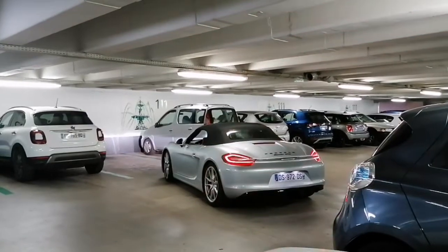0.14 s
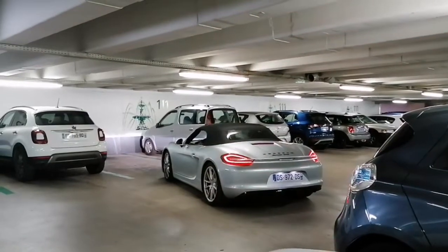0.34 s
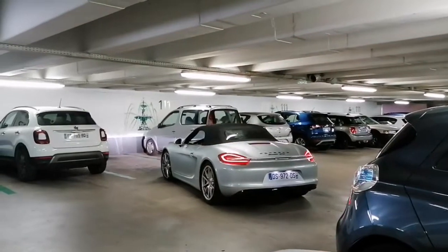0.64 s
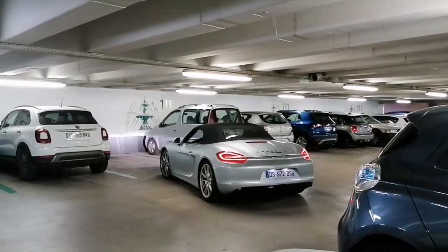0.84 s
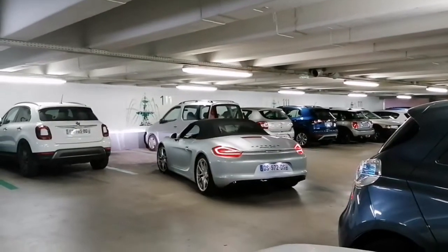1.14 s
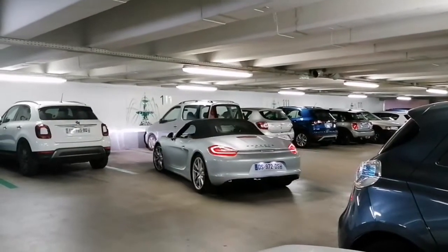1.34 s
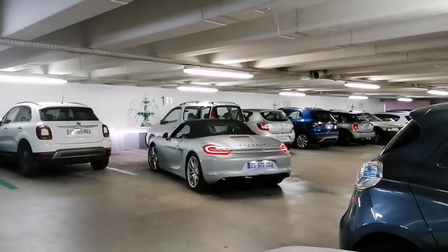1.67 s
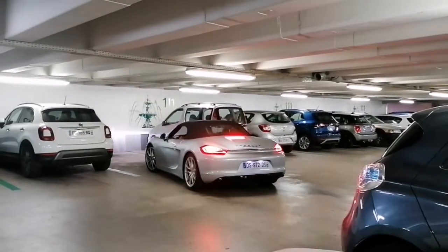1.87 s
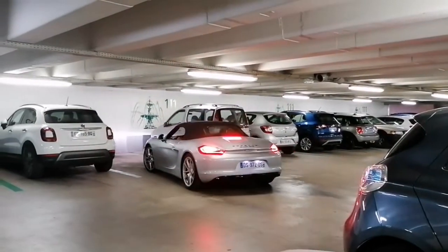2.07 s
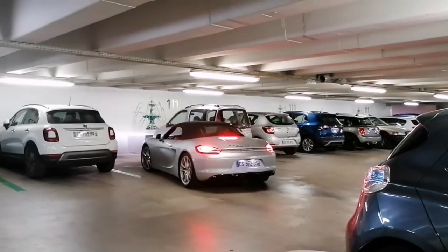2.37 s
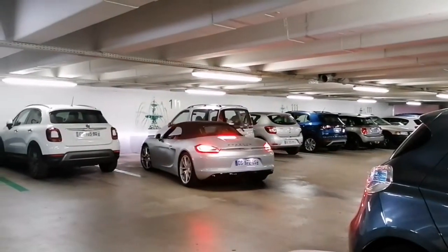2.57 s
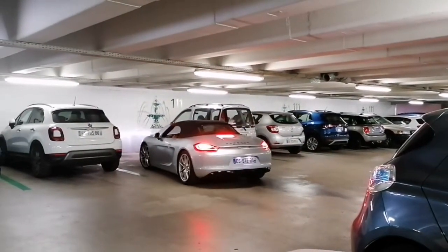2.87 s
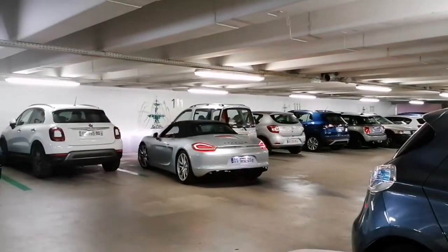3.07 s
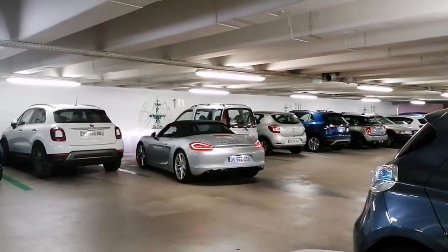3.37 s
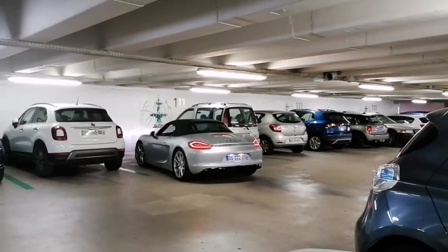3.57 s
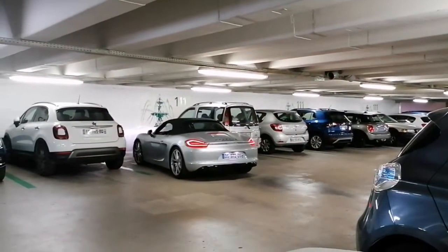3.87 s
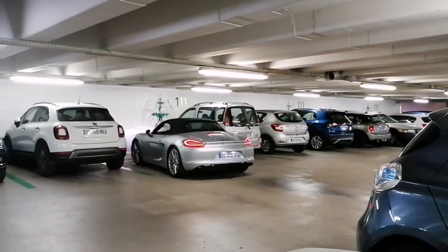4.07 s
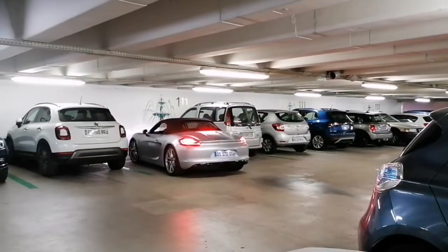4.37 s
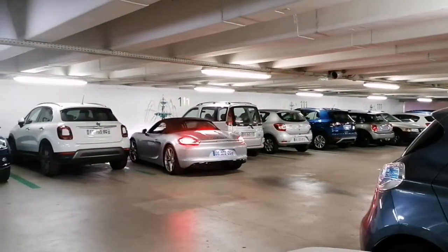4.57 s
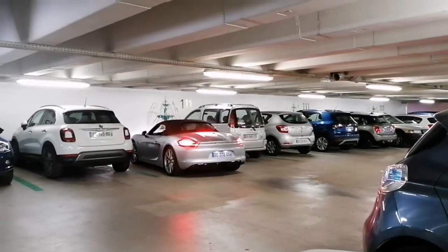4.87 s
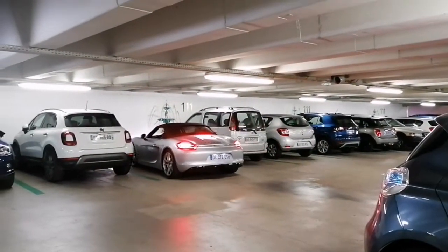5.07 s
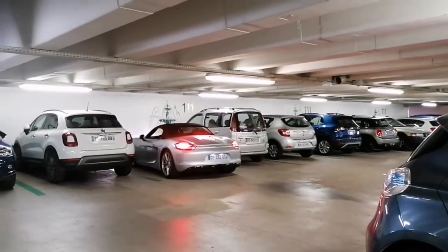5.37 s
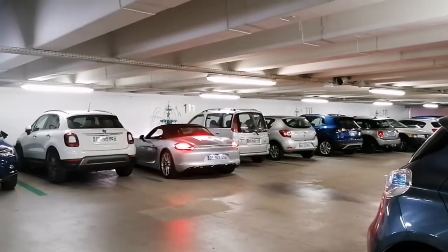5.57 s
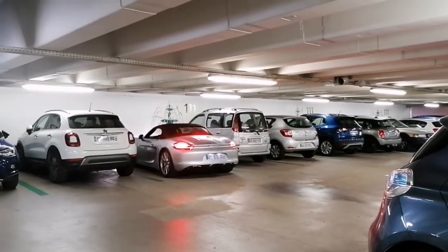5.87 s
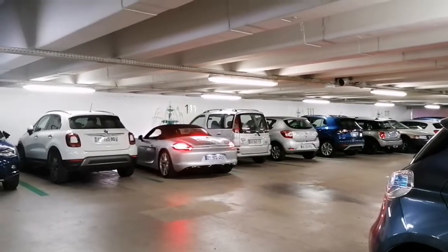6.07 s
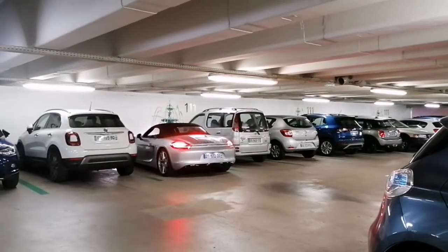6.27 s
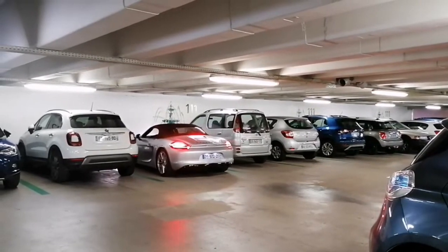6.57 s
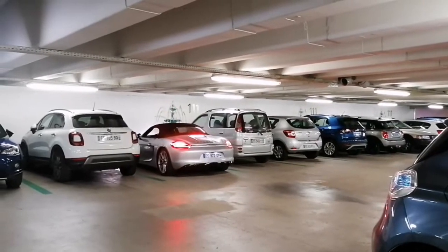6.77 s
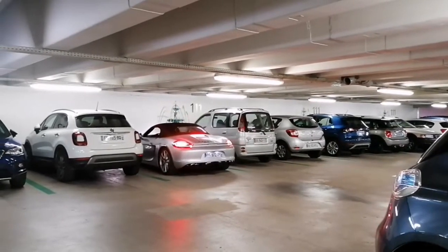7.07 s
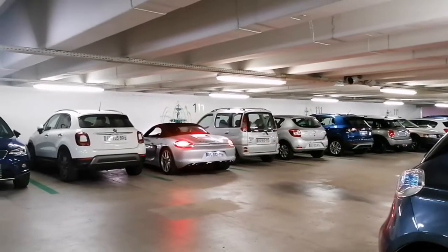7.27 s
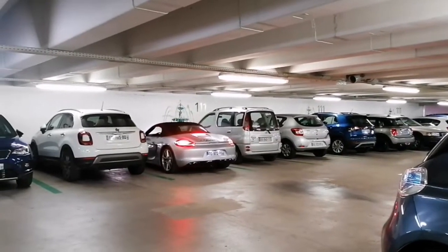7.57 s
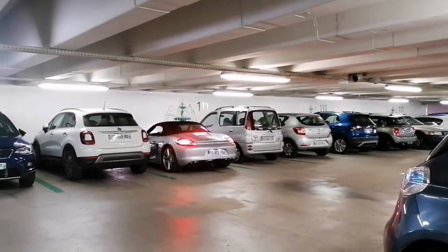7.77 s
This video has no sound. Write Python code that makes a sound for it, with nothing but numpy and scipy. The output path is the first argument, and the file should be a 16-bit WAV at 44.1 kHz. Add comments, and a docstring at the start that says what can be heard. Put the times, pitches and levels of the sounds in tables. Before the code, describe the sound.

A sports car gives a light rev, drops to a deep burbling idle and creeps into a space in an echoing underground car park.

```python
"""A flat-six sports car creeps into a space in a concrete underground car park, heard from across the aisle.
A light rev drops to idle: firing harmonics boom and fade as the car rolls through standing waves, pulses filtered
by silencers and tailpipes burble and puff, and filtered noise makes the engine bay's rush and the ventilation's hiss.
Narrow wandering tones sing from the rev onwards; then brake pads brush as swells of coloured noise, a tyre chirps
as one very short tone, and a wavering whine joins the last creep."""
import sys
import numpy as np
from scipy import signal
from scipy.fft import rfft, irfft
from scipy.io import wavfile
from scipy.ndimage import uniform_filter1d

SR = 44100
rng = np.random.default_rng(int(sys.argv[2]) if len(sys.argv) > 2 else 0)


def wav_record(signal):
    """Record a signal, one row per channel, as 16-bit PCM in the file named by sys.argv[1]."""
    frames = np.transpose(np.atleast_2d(signal))
    bounded = np.clip(frames, -1, 1)
    # unit amplitude maps onto the largest positive 16-bit level
    quanta = np.round(bounded * 32767).astype(np.int16)
    wavfile.write(sys.argv[1], SR, quanta)


N = 348831

RING_RISE_S, RING_FALL_S = 0.06, 0.2   # edges of the narrow tones and the whine


def from_db(db):
    """Decibels to gain."""
    return 10 ** (np.asarray(db) / 20)


def rms_one(x):
    """Scale to unit power."""
    return x / np.sqrt(np.mean(x ** 2) + 1e-20)


def in_time(rows):
    """Each column of a curve table, interpolated sample by sample."""
    s, *columns = np.transpose(rows)
    return [np.interp(np.arange(N) / SR, s, column) for column in columns]


def drift(rate_hz):
    """Slow random wander of spread 1: noise through two equal poles, run at a fortieth of the sample rate."""
    step = 40
    warm_up = 2000
    pole = np.exp(-2 * np.pi * rate_hz * step / SR)
    white = rng.standard_normal(N // step + warm_up + 2)
    slow = signal.lfilter([1], [1, -2 * pole, pole * pole], white)[warm_up:]
    return np.interp(np.arange(N) / step, np.arange(len(slow)), rms_one(slow))


def colour(x, points):
    """Causal (minimum-phase) filter through the (Hz, dB) points, scaled to rms 1."""
    size = 8192
    hz, db = np.transpose(points)
    bins_hz = np.arange(size // 2 + 1) * SR / size
    gain = from_db(np.interp(np.log(bins_hz + 1), np.log(hz), db))
    # folding the cepstrum onto positive time gives minimum phase
    cepstrum = irfft(np.log(gain))
    cepstrum[1:size // 2] *= 2
    cepstrum[size // 2 + 1:] = 0
    impulse = irfft(np.exp(rfft(cepstrum)))
    return rms_one(signal.oaconvolve(x, impulse)[:N])


def steady(x):
    """Level to unit power over every quarter of a second."""
    return x / np.sqrt(uniform_filter1d(x ** 2, size=SR // 4) + 1e-12)


def swell(start, end, rise_s, fall_s):
    """Rise, hold and fall, 0-1; the edges are centred on start and end."""
    t = np.arange(N) / SR
    return np.clip(np.minimum((t - start) / rise_s, (end - t) / fall_s) + 0.5, 0, 1)


def hall_tail(x):
    """The long ring of bare concrete from one spot, already sounding at the start; treble dies sooner."""
    t60_s, treble_t60_s = 2.02, 1
    t = np.arange(int(SR * 1.5)) / SR
    white = rng.standard_normal(len(t))
    low = signal.sosfilt(signal.butter(2, 1500, fs=SR, output="sos"), white)
    treble = white - low
    tail = low * from_db(-60 * t / t60_s) + treble * from_db(-60 * t / treble_t60_s)
    # mirrored sound ahead of the start fills the hall before the first sample
    earlier = np.pad(x, (len(t) - 1, 0), mode="reflect")
    return rms_one(signal.fftconvolve(earlier, tail, mode="valid"))


def car_park(x, wet_db):
    """Direct sound plus reflections whose pattern keeps changing as the car rolls."""
    place = 2 * np.pi * 0.3026 * np.arange(N) / SR
    reflections = np.cos(place) * hall_tail(x) + np.sin(place) * hall_tail(x)
    return x + from_db(wet_db) * reflections


def firings(turns, uneven_db, jitter_s):
    """One pressure pulse per firing; every cylinder has its own strength and no two burns are alike."""
    # strength of the six cylinders in firing order, the two banks taking turns: level [dB]
    cylinder_db = [2.5, -5, -1.5, 1, 1, -5.5]
    at = np.flatnonzero(np.diff(np.floor(turns)))
    chance = rng.standard_normal((len(at), 2))
    late = (jitter_s * SR * chance[:, 0]).astype(int)
    when = np.clip(at + late, 0, N - 1)
    pulses = np.zeros(N)
    pulses[when] = from_db(np.resize(cylinder_db, len(at)) + uneven_db * chance[:, 1])
    return pulses


def puffs(pulses, decay_s):
    """Each pulse releases a burst of turbulence that dies away."""
    envelope = signal.lfilter([1], [1, -np.exp(-1 / (decay_s * SR))], pulses + 1e-18)
    return rms_one(envelope * rng.standard_normal(N))


def tone(cycles, waver_db, waver_rate):
    """A sine that follows the running count of cycles and wavers in level around rms 1."""
    sine = np.sin(2 * np.pi * (cycles + rng.random()))
    return np.sqrt(2) * sine * from_db(waver_db * drift(waver_rate))


def singing(turns, hz, wander_hz, throb=0.16):
    """A narrow resonance throbs with the firings and wanders in pitch and level."""
    cycles = np.cumsum(hz + wander_hz * drift(14.2)) / SR
    pulsing = 1 + throb * np.cos(2 * np.pi * (turns + rng.random()))
    return pulsing * tone(cycles, waver_db=3.0, waver_rate=14)


def boom(turns):
    """Firing tone and octave swell in the hall's standing waves; the unequal banks add a weak half order."""
    # swells where car and hall meet in a standing wave:
    # (start [s], end [s], firing tone [dB], its octave [dB], growth of the octave from start to end [dB])
    standing_waves = [(-.1, 0.272, -27.5, -24, -1), (0.442, 0.6, -23, -26, -7.5),
                      (2.19, 3.68, -47, -36, -2.5), (3.84, 4.5, -39, -31.5, -6.5),
                      (4.655, 4.83, -48, -33, -2), (4.983, 5.22, -39.5, -35.5, 1),
                      (5.35, 6.6, -41.5, -26.5, 0), (6.881, 7.27, -36.5, -23.8, 8),
                      (7.35, 7.518, -42, -25.5, -1.5), (7.642, 7.951, -36.5, -27, -8)]
    tone_rest_db, octave_rest_db = -41.5, -41.5   # between the swells
    tone_sag_db = 7   # the firing tone fades by this much through each swell
    rise_s, fall_s = 0.14, 0.14
    t = np.arange(N) / SR
    first, second = from_db(tone_rest_db), from_db(octave_rest_db)
    for start, end, tone_db, octave_db, growth_db in standing_waves:
        shape = swell(start, end, rise_s, fall_s)
        along = np.interp(t, [start, end], [-0.5, 0.5])
        first = first + shape * (from_db(tone_db - tone_sag_db * along) - from_db(tone_rest_db))
        second = second + shape * (from_db(octave_db + growth_db * along) - from_db(octave_rest_db))
    firing_tone = first * tone(turns, waver_db=1.8, waver_rate=16)
    octave = second * tone(2 * turns, waver_db=1.3, waver_rate=12)
    half_order = from_db(-56.5) * tone(1.5 * turns, waver_db=5, waver_rate=1.8)
    return firing_tone + octave + half_order


def drone(turns):
    """The next harmonics; their echoes lag behind and blur them when the speed changes."""
    # exhaust harmonics: (time [s], third harmonic [dB], fourth harmonic [dB], fifth harmonic [dB])
    harmonic_levels = [(0.0, -41.5, -60.5, -56.5), (0.25, -31.5, -61, -53), (0.6, -59.5, -50, -52.5),
                       (1.0, -49, -38.5, -46), (1.7, -46.5, -41.5, -36), (2.1, -46.5, -45, -55),
                       (3.2, -42.5, -55.0, -41.5), (3.6, -53.5, -44.5, -43), (4.4, -47, -45.5, -48),
                       (4.9, -51.5, -50, -52), (6.1, -43, -46, -50), (6.7, -51, -44.5, -50.0),
                       (7.2, -41.5, -50, -48), (7.91, -45.0, -49, -63)]
    lines = np.zeros(N)
    for order, db in zip((3, 4, 5), in_time(harmonic_levels)):
        cycles = order * turns + 0.03 * drift(7.5)
        lines += from_db(db) * tone(cycles, waver_db=1.5, waver_rate=12)
    return np.std(lines) * car_park(rms_one(lines), wet_db=-9.5)


def burble(turns):
    """Firing pulses ring in the silencers and roll around the hall."""
    # silencer colour: (frequency [Hz], relative level [dB])
    silencer = [(90, -43.5), (140, -16), (178, -0.5), (215, 1), (250, -4.5), (285, 1.5), (315, -11.5),
                (380, -20), (600, -31.5), (1200, -55.5)]
    pulses = firings(turns, uneven_db=1.9, jitter_s=0.00046)
    gas = rms_one(pulses) + from_db(-10.5) * puffs(pulses, decay_s=0.0066)
    return steady(car_park(colour(gas, silencer), wet_db=3.5))


def rasp(turns):
    """Each firing leaves the tailpipes as a dull thump and a puff of hiss."""
    # tailpipe colour: (frequency [Hz], relative level [dB])
    tailpipe = [(220, -19.5), (340, 0), (370, -5.5), (410, -0.5), (450, -6), (505, -0.5), (560, -5),
                (700, -4.5), (770, -0.5), (830, -4), (900, -4), (1020, -8), (1250, -17.5), (2500, -33.5)]
    pulses = firings(turns, uneven_db=1.0, jitter_s=0.00007)
    thumps = signal.sosfilt(signal.butter(2, 650, fs=SR, output="sos"), rms_one(pulses))
    gas = from_db(2.5) * thumps + puffs(pulses, decay_s=0.009)
    return steady(car_park(colour(gas, tailpipe), wet_db=8.0))


def engine_bay(turns):
    """Valves and injectors tick into the rush of belts and intake air."""
    # engine bay colour: (frequency [Hz], relative level per Hz [dB])
    bay_colour = [(500, -11.5), (1000, -3.5), (1250, -2), (1530, 2.5), (1800, -2.5), (2050, 0.5),
                  (2190, 3.5), (2500, -1.5), (2800, -4.5), (3000, -1.5), (3300, -6.5), (3850, -5.5),
                  (4250, -11), (4850, -4), (6200, -11), (6900, -10), (7500, -19)]
    pulses = firings(turns, uneven_db=1.5, jitter_s=0.003)
    ticks = car_park(puffs(pulses, decay_s=0.003), wet_db=7)
    rush = rng.standard_normal(N)
    return colour(rush + from_db(-4.5) * rms_one(ticks), bay_colour)


def ventilation():
    """Moving air hisses steadily: noise shaped by the ducts' colour."""
    # ventilation colour: (frequency [Hz], relative level per Hz [dB])
    vent_colour = [(20, -11), (35, -5), (55, -8), (85, -10.5), (115, -6.5), (160, -0.5), (220, 0),
                   (290, -8), (360, -14), (780, -17.5), (1200, -27), (2200, -26.5), (4300, -33),
                   (7500, -37)]
    return from_db(-45.0) * colour(rng.standard_normal(N), vent_colour)


def rev_rings(turns, effort):
    """Resonances that build up just behind the throttle and fade with it."""
    # resonances under throttle: (frequency [Hz], wander [Hz], level at full effort [dB])
    resonances = [(458, 7, -44), (433.5, 5.3, -45.5), (770, 5.5, -50), (844, 30, -51)]
    lag_s, range_db = 0.08, 21
    t = np.arange(N) / SR
    drive = from_db(range_db * (np.interp(t - lag_s, t, effort) - 1))
    return drive * sum(from_db(db) * singing(turns, hz, wander_hz) for hz, wander_hz, db in resonances)


def rings(turns):
    """Narrow resonances of car and hall build up, sing for a while and die away."""
    # narrow tones: (start [s], end [s], frequency [Hz], level [dB])
    narrow_tones = [(.1, .55, 1583, -56), (.16, 0.553, 1644, -55.5), (1.267, 1.651, 510, -51),
                    (4.255, 4.545, 298, -42.5), (4.549, 5.1, 417, -52), (4.55, 4.85, 777, -53),
                    (5.1, 6.4, 510, -55), (5.62, 6.15, 274, -40), (5.85, 6.55, 768, -53),
                    (7.051, 7.45, 279, -42)]
    wander = 0.00683   # share of the pitch
    total = np.zeros(N)
    for start, end, hz, db in narrow_tones:
        shape = swell(start, end, RING_RISE_S, RING_FALL_S)
        total += from_db(db) * shape * singing(turns, hz, wander * hz)
    return total


def brakes():
    """Pads rub the discs with a soft hiss as the brakes check the car."""
    # brake rubs: (start [s], end [s], level [dB])
    brakings = [(2.067, 2.58, -53), (3.98, 4.35, -54)]
    # pad colour: (frequency [Hz], relative level per Hz [dB])
    pads = [(500, -19.5), (900, 1), (1400, -2), (2200, -2), (3200, -13.5), (7000, -25.5)]
    edge_s = 0.1
    pressure = sum(from_db(db) * swell(start, end, edge_s, edge_s) for start, end, db in brakings)
    return pressure * colour(rng.standard_normal(N), pads)


def tyre_chirp():
    """Rubber slips on the painted floor for an instant: a tone under a bell-shaped envelope."""
    # the chirp: (time [s], frequency [Hz], level [dB], spread of the bell [s])
    s, hz, db, length_s = (3.41, 1545, -53, .016)
    t = np.arange(N) / SR
    bell = np.exp(-((t - s) / length_s) ** 2 / 2)
    return from_db(db) * bell * tone(hz * t, waver_db=-1.0, waver_rate=30)


def whine(turns):
    """An unsteady tone throbs with the firings while the car inches in."""
    # the last creep: (start [s], end [s], frequency [Hz], wander [Hz], level [dB])
    start, end, hz, wander_hz, db = (5, 8, 780, 18.5, -54)
    shape = swell(start, end, RING_RISE_S, RING_FALL_S)
    return from_db(db) * shape * singing(turns, hz, wander_hz, throb=0.4)


def scene():
    """The car and the ventilation, heard from across the aisle."""
    # engine speed: (time [s], firings per second [Hz])
    speed = [(0.0, 41.1), (0.33, 43), (0.61, 40.2), (0.84, 33.9), (1.03, 30.7), (1.23, 33.9), (2.91, 34.8),
             (3.46, 34.1), (3.92, 31.4), (4.49, 33.3), (4.65, 34.7), (5.11, 36.4), (5.18, 33.7),
             (5.9, 34.6), (6.76, 31.5), (6.83, 34.8), (7.03, 33.4), (7.31, 35.7), (7.49, 34.1),
             (7.91, 34.4)]
    # a dab of throttle, a small catch as the speed falls, then idle: (time [s], effort [0-1])
    throttle = [(0, 0.55), (.15, .97), (.43, 0.91), (.74, 0.25), (.92, 0.37), (1.25, 0.08), (7.91, 0)]
    # the clutch takes up load, tailpipes and whine grow louder: (start [s], end [s], added level [dB])
    nudges = [(.87, 1.03, 2), (4.55, 4.846, 2), (6.87, 7.08, 1.7)]
    nudge_edge_s = 0.11
    nosing_in_db_per_s = 0.17   # the walls of the space throw back more exhaust as the car noses in

    firing_hz, = in_time(speed)
    effort, = in_time(throttle)
    turns = np.cumsum(firing_hz * (1 + 0.003 * drift(6))) / SR   # running count of firings
    walls = from_db(nosing_in_db_per_s * (np.arange(N) - N / 2) / SR)
    load = from_db(sum(db * swell(start, end, nudge_edge_s, nudge_edge_s) for start, end, db in nudges))

    # engine levels: dB at zero effort, plus the dB that full effort adds
    silencers = from_db(-38.5 + 4 * effort) * burble(turns)
    tailpipes = load * from_db(-45.5 + 5.5 * effort) * rasp(turns)
    bay = from_db(-50.5 + 6.5 * effort) * engine_bay(turns)

    exhaust = boom(turns) + drone(turns) + walls * (silencers + tailpipes)
    tones = rev_rings(turns, effort) + rings(turns) + load * whine(turns)
    return (exhaust + bay + ventilation() + tones + brakes() + tyre_chirp())[None]


def record(dry):
    """The microphone signal loses its top to a steep low-pass."""
    cutoff_hz = 7400
    return signal.sosfilt(signal.ellip(10, 0.2, 80, cutoff_hz, fs=SR, output="sos"), dry)


dry = scene()
out = record(dry)
wav_record(out)
```